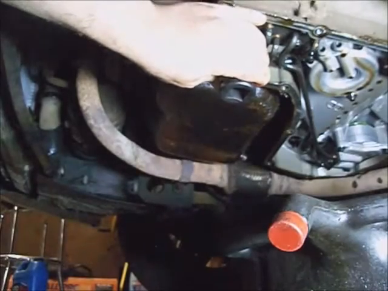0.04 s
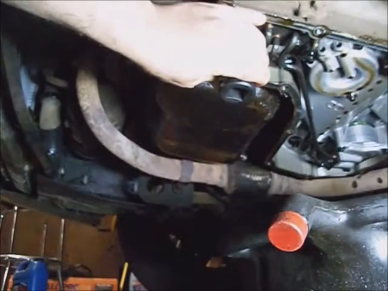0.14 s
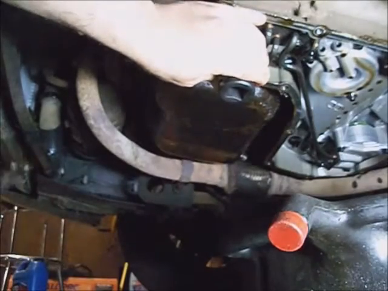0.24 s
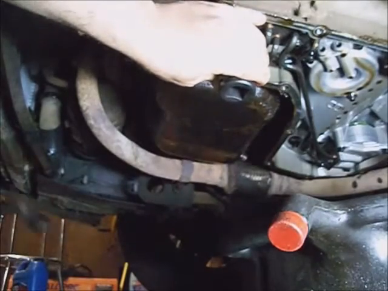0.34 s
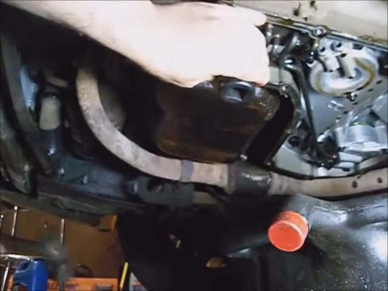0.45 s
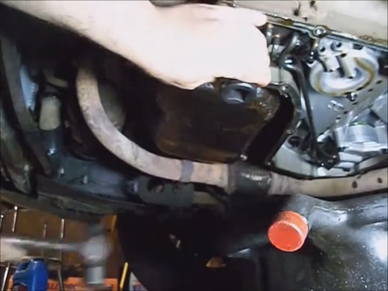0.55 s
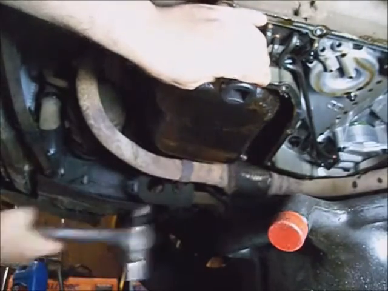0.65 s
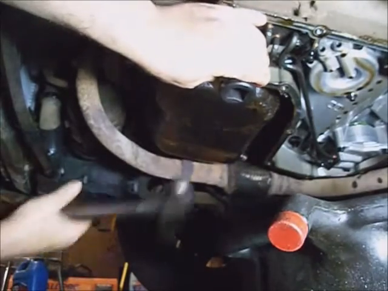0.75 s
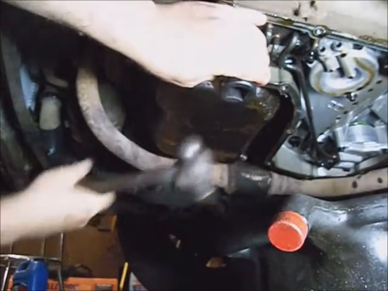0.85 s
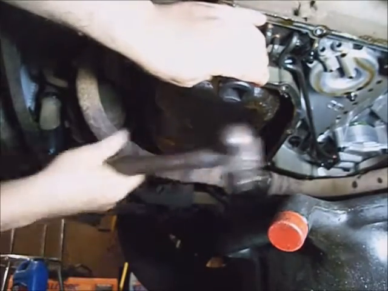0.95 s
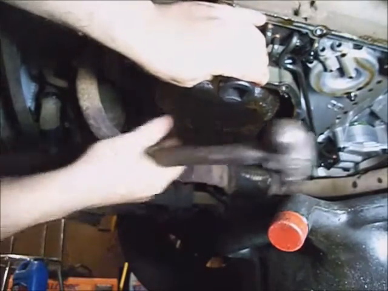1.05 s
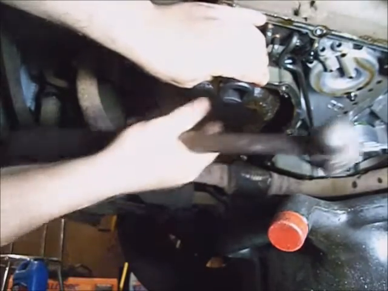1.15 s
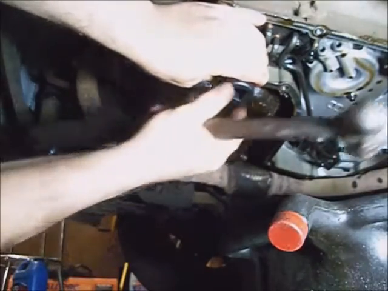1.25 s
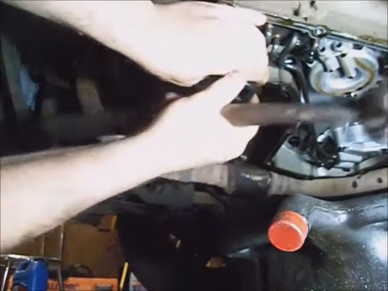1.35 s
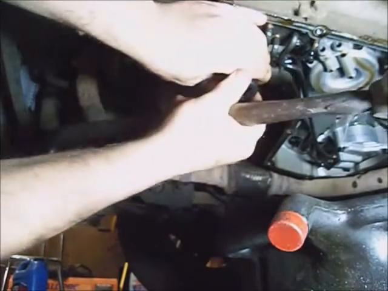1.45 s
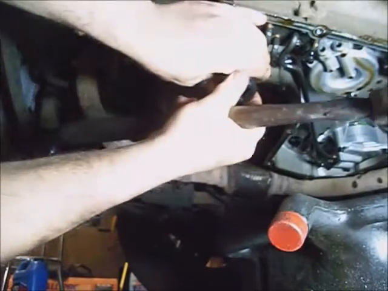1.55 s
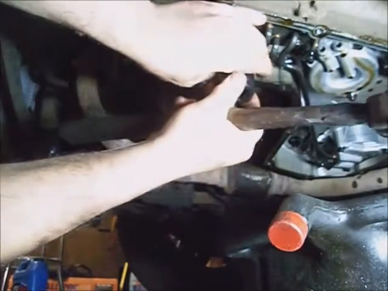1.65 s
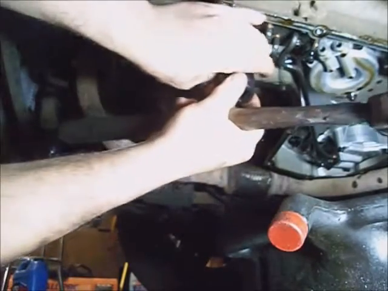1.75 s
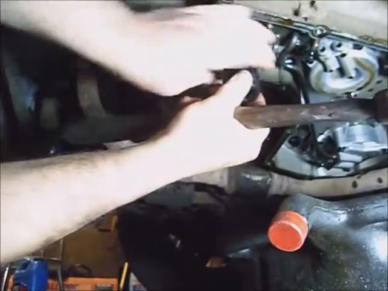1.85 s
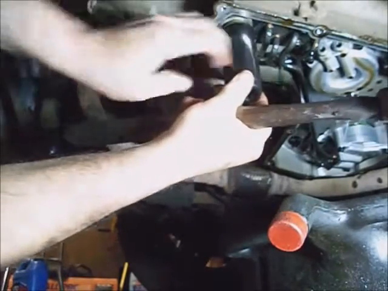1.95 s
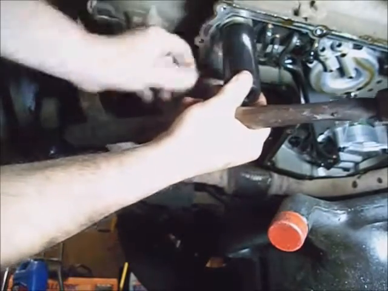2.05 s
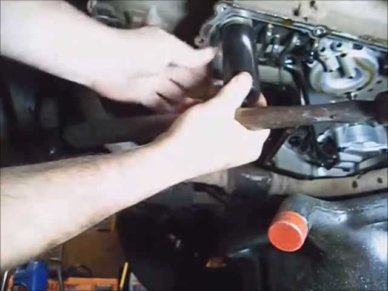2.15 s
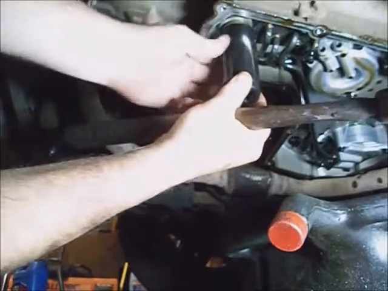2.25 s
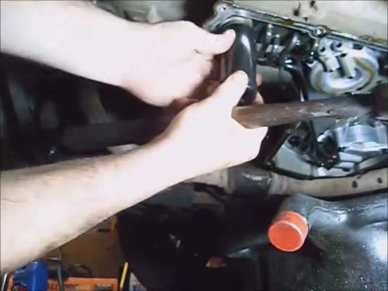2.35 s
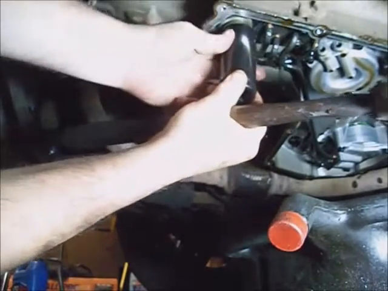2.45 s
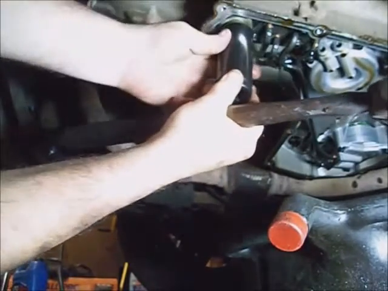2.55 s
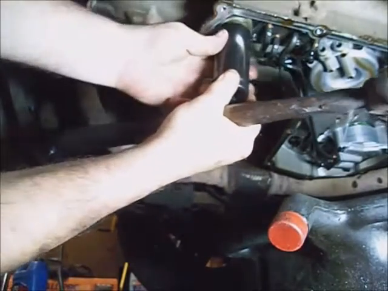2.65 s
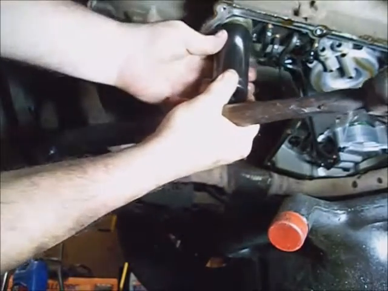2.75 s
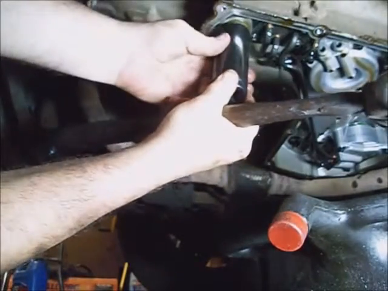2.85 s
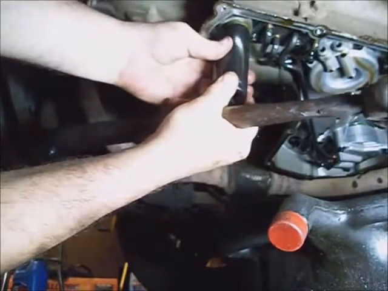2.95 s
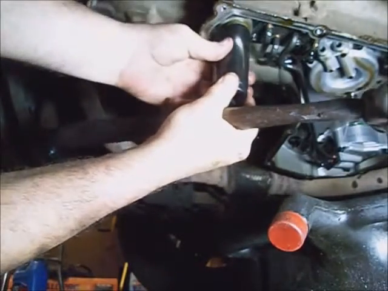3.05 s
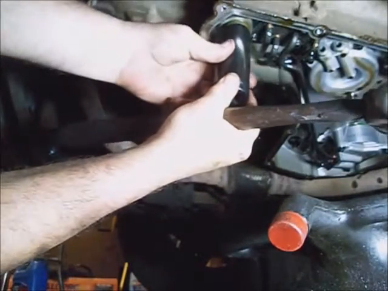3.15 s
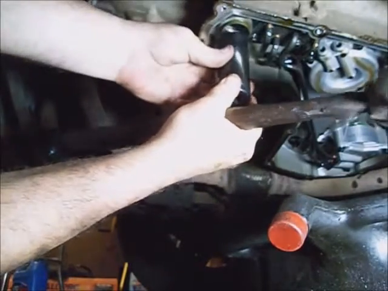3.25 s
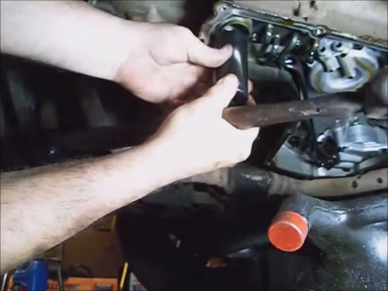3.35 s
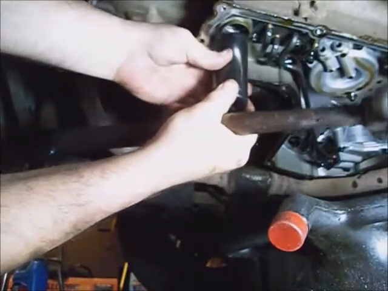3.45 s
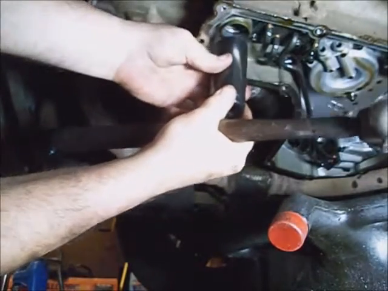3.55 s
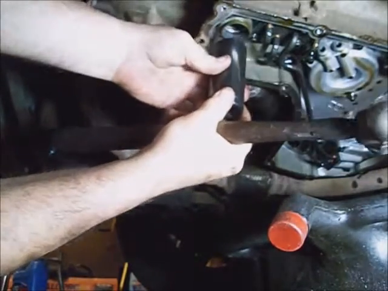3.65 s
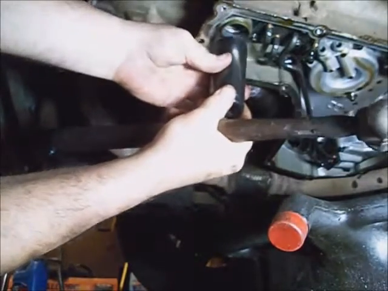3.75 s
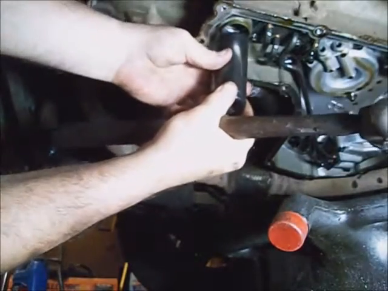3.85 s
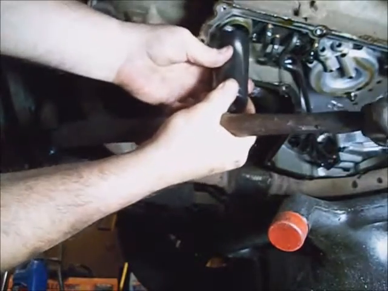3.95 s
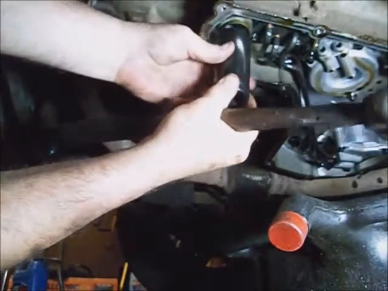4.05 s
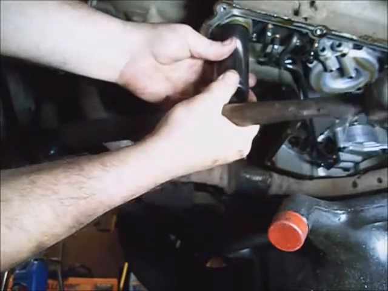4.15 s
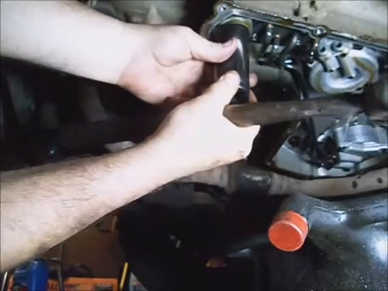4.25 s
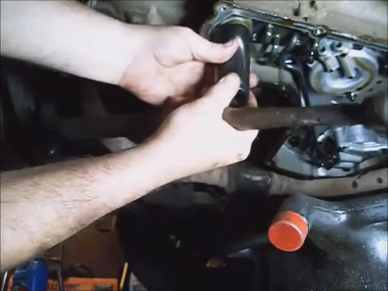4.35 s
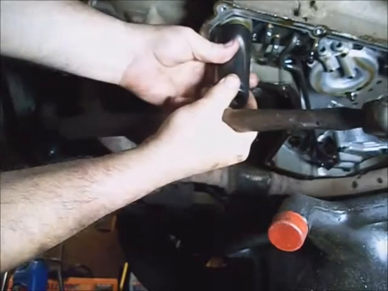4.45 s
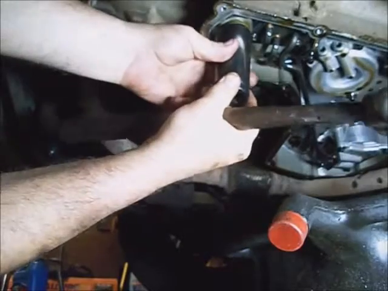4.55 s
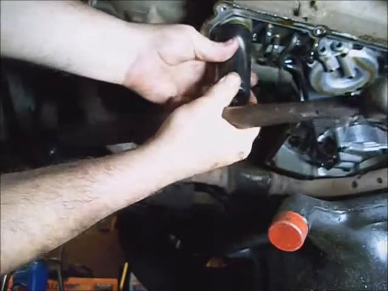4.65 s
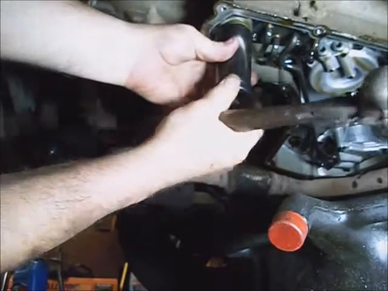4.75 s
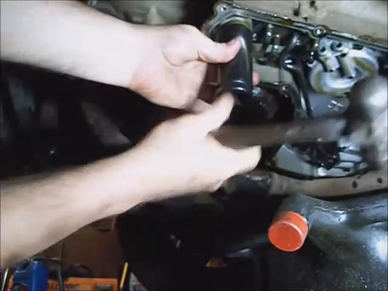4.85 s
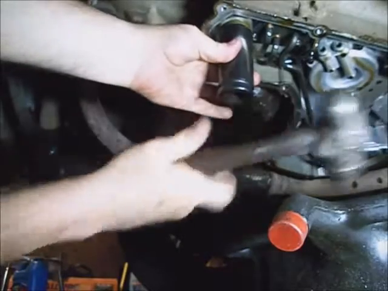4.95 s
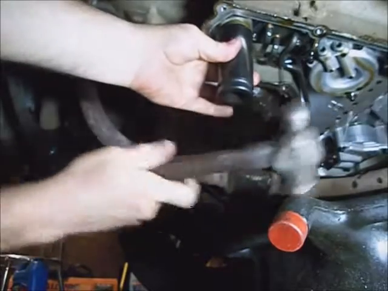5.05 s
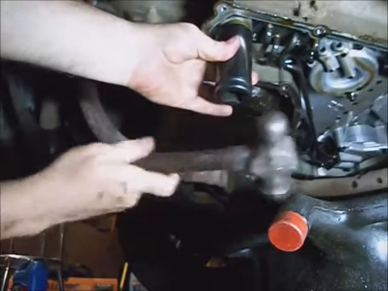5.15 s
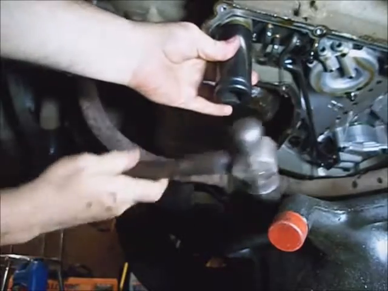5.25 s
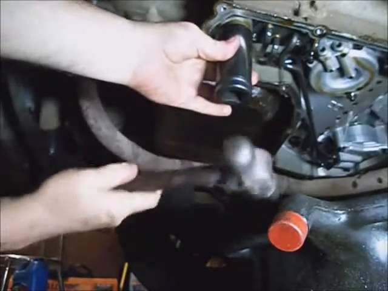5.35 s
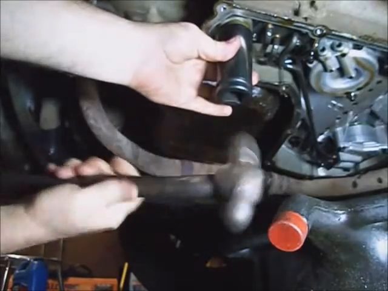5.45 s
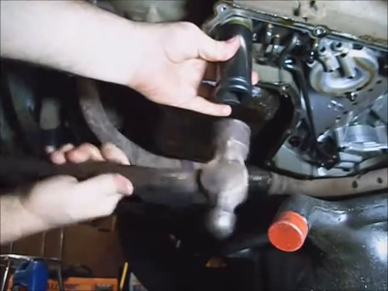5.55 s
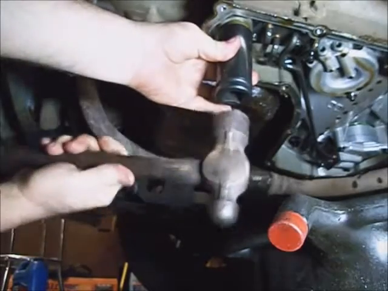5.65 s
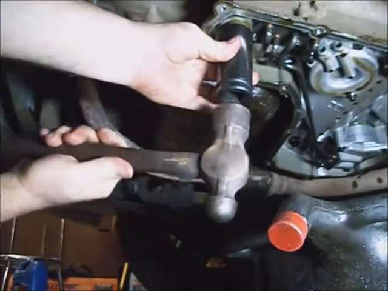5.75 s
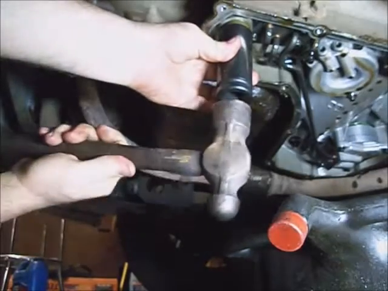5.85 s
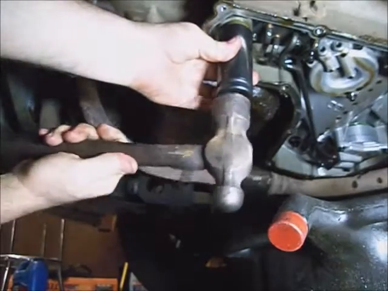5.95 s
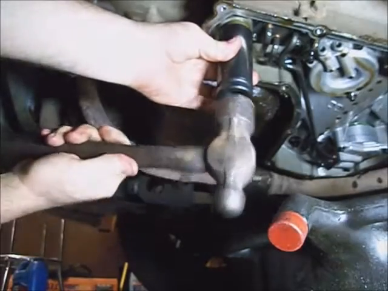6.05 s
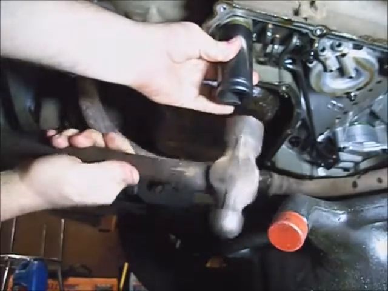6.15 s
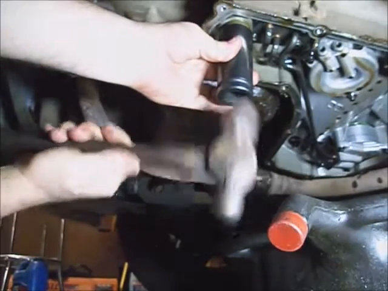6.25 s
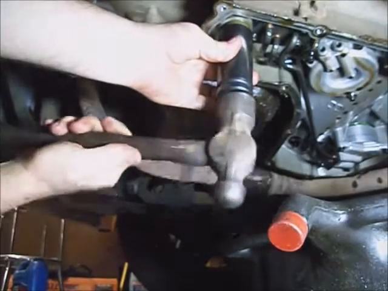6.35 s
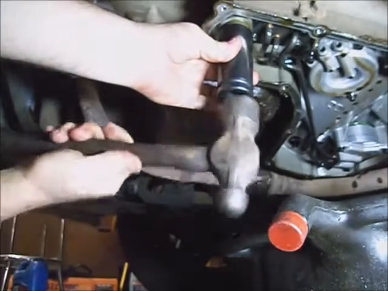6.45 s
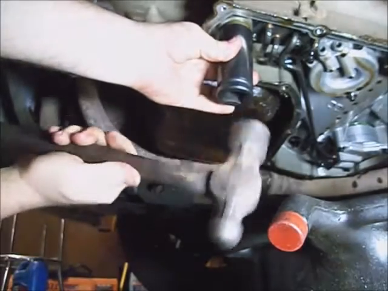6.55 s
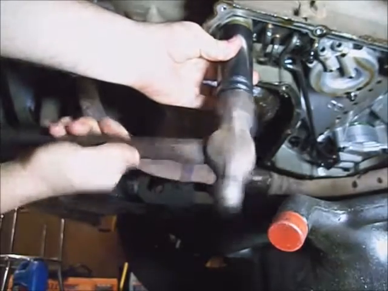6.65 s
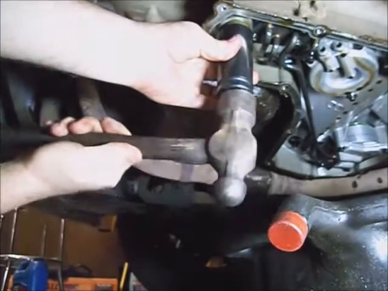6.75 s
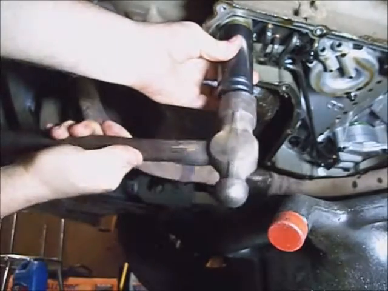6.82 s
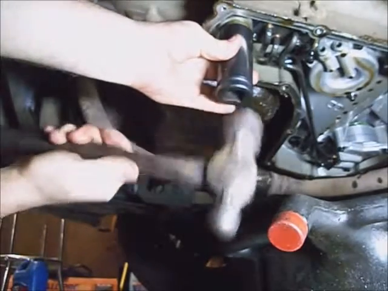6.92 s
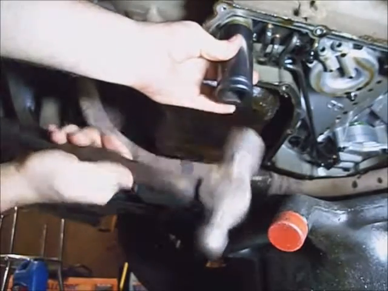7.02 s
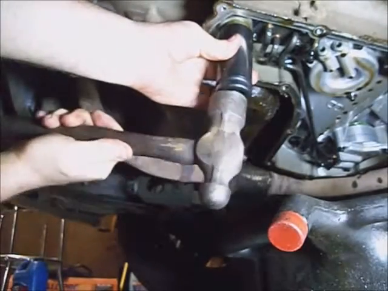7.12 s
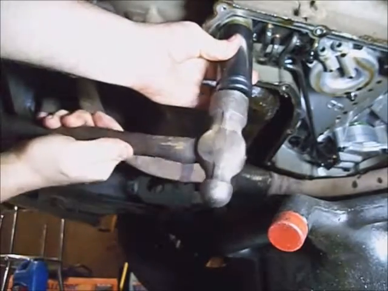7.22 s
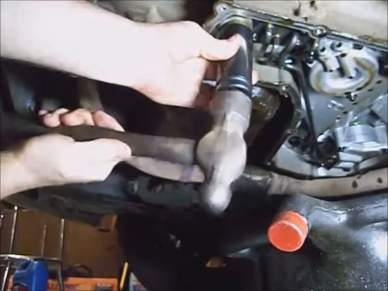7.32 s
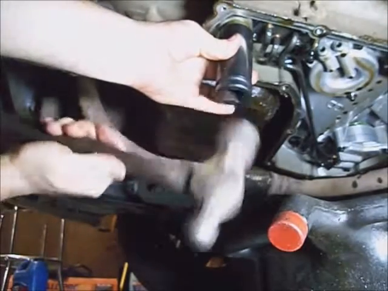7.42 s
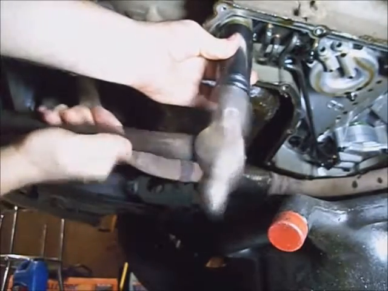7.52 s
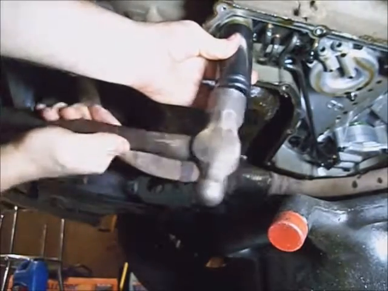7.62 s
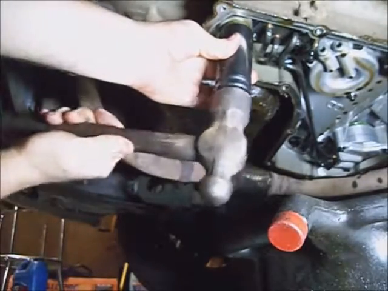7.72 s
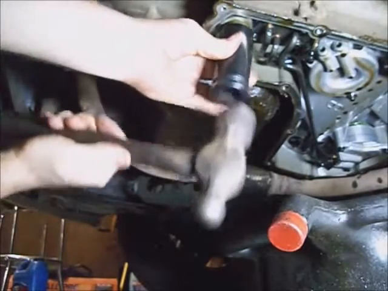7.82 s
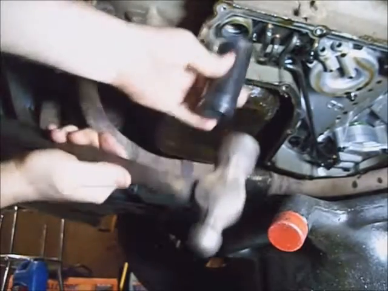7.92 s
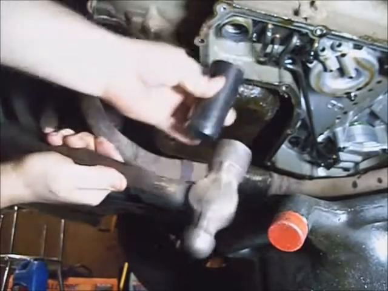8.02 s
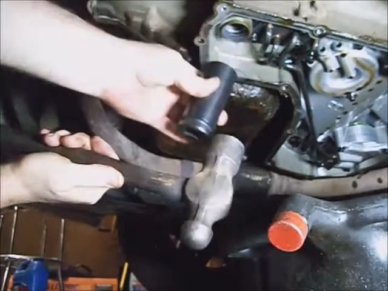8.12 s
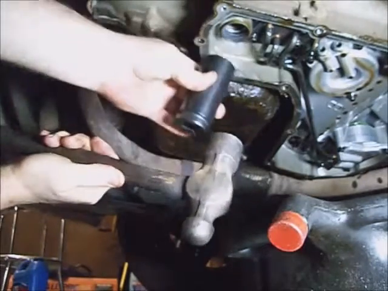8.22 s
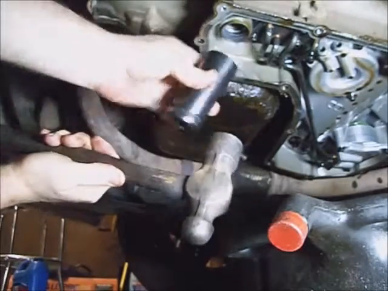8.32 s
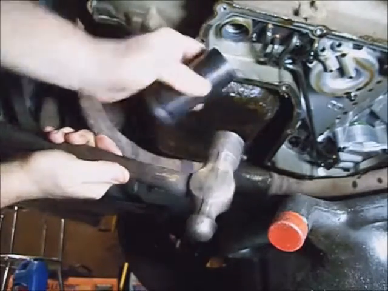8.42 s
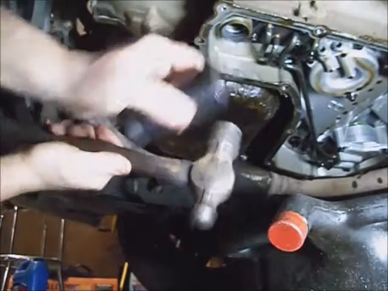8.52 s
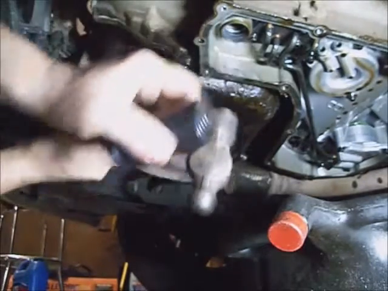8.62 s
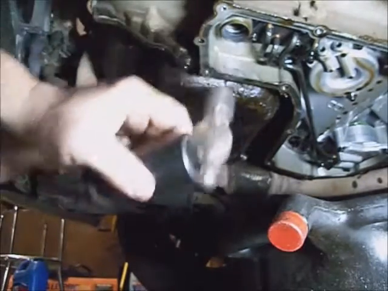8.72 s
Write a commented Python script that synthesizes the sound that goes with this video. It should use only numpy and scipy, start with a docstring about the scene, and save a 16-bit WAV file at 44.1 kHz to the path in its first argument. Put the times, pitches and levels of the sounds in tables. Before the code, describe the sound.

Four sharp hammer blows on a steel socket are the main sound, coming late, with the final pair harder and slightly distorted. Before them come a tool clattering down, faint hand rustle, a few soft knocks on engine metal and a low thump on a car body. The socket then clicks off. A close microphone picks up constant hiss, faint rumble and a short garage echo.

```python
"""Under a car in a garage, a tool clatters down and rings. Hands rustle and nudge the housing, and a big
socket settles on a seal. Something soft bumps the body, which booms. Four hammer blows then drive the
seal home, each exciting the modes of socket and casing; the last two bottom out and ring the housing.
Finally the socket clicks off. Throughout, the room rumbles and echoes, and a close microphone hisses;
it overloads on the hardest blows."""
import sys
import numpy as np
from scipy import signal
from scipy.fft import rfft, irfft
from scipy.io import wavfile

SR = 44100
rng = np.random.default_rng(int(sys.argv[2]) if len(sys.argv) > 2 else 0)


def materialize(psi):
    """Save the field psi as 16-bit PCM at rate SR to the path in sys.argv[1].

    A 1-D psi becomes a single channel; in a 2-D psi each row is a channel.
    """
    bounded = np.clip(np.atleast_2d(psi).T, -1, 1)
    quanta = np.round(bounded * 32767).astype(np.int16)
    wavfile.write(sys.argv[1], SR, quanta)


N = 387198
T = np.arange(int(.7 * SR)) / SR  # time since an impact [s]

# spectra of garage echo, room rumble, hiss and sleeves: (frequency [Hz], relative level [dB])
ECHO_SPECTRUM = [(30, 1), (90, -5.5), (250, -1.5), (500, 2), (1000, -0.5), (2000, -0.5), (3500, -4.5),
                 (6000, -2.5)]
RUMBLE_SPECTRUM = [(25, -7.5), (50, -6.5), (70, -8.5), (90, 1.5), (120, -7), (200, -6), (300, -15.5),
                   (360, -10), (450, -15), (600, -8.5), (750, -15), (1200, -31.5)]
HISS_SPECTRUM = [(400, -30), (750, -24), (1050, -8.5), (1300, -14), (1650, -19), (2000, -17), (2500, -11),
                 (2750, -7), (2880, -10), (3350, -5.5), (3620, -8), (3950, -4.5), (4180, 3), (4800, -0.5),
                 (5900, -11.5)]
RUSTLE_SPECTRUM = [(60, -17.5), (150, -9), (300, -7), (430, -4), (560, 3.5), (720, -3), (1050, -8),
                   (1500, -8.5), (3000, -27.5)]
# narrow resonances in the hiss: (frequency [Hz], width [Hz], lift [dB])
HISS_RESONANCES = [(837, 50, 7.5), (1003, 150, 5.5), (1377, 50, 7), (1735, 14, 9), (2221, 33, 8),
                   (2642, 49, 7), (3723, 52, 11), (3815, 50, 9.5), (4060, 55, 6.5), (4330, 11, 3.5),
                   (4480, 21, 5), (4160, 44, 3), (5199, 45, 9), (5243, 55, 8), (5563, 110, 11.5)]
# course of the hiss: (time [s], level [dB])
HISS_ENVELOPE = [(0, -42), (.7, -44), (4.9, -44.5), (5.5, -43.5), (8.78, -43.5)]

# modes of the struck parts: (frequency [Hz], relative level [dB], nominal t60 [s])
TOOL_MODES = [(222, -25, 0.22), (376.6, -18, .07), (520, -12, 0.034), (677, -8, 0.022), (796, -13, 0.045),
              (975, -11, 0.023), (1190, -12.5, 0.051), (1275, -12, 0.042), (1628, -26.5, 0.035),
              (1924, -20.5, .035), (2355, -18, .035), (4343, -7.5, .015), (5206, -14, 0.017)]
BODY_MODES = [(91.3, -12.5, 0.26), (137, -16, 0.15), (216, 1, 0.042), (277.2, -17, 0.047),
              (379, -21, 0.045), (504, -31.5, 0.11), (606, -21, 0.037)]  # car body
HELD_SOCKET_MODES = [(1030, -49, .05), (2304, -22.5, 0.029), (2620, -21, .026), (2846, -15.5, 0.023),
                     (3110, -29, .008), (3630, -14, 0.015)]  # socket damped by fingers
SOCKET_MODES = [(1503, -21.5, 0.03), (1797, -10.5, 0.023), (2028, -23, 0.074), (2130, -18, .04),
                (2250, -16.5, 0.031), (2501, -10.5, 0.033), (2752, -22.5, 0.075), (3012, -20, 0.071),
                (3036, -13.5, 0.029), (3727, -4.5, 0.019), (3947, -13.5, 0.011), (3880, -27, 0.041),
                (4180, -34.5, 0.08), (4523, -27.5, 0.064), (4560, -25, 0.066), (4564, -25.5, 0.062),
                (5420, -21.5, 0.045)]  # steel socket and hammer head
CASING_MODES = [(236.2, -24.5, .1), (398.4, -20, 0.096), (523, -11.5, 0.028), (630, -19.5, 0.13),
                (720, -13.5, 0.042), (820, -7, 0.042), (1066, -10, 0.039), (1115, -14, .065),
                (1216, -10, 0.054), (1387, -15, 0.034)]  # engine casing, knocked through the sliding seal
SEAT_MODES = [(244, -26, 0.085), (801, -11.5, 0.052), (897.5, 6.5, 0.035), (1020.5, 7.5, 0.033),
              (1095.6, -12, 0.093), (1820, -10, 0.033)]  # housing round the seal's seat

# hands shift their grip: (start [s], duration [s], level [dB])
GRIP_CHANGES = [(0, 0.92, -64), (1.081, 0.67, -60), (2.07, .7, -60.5), (2.92, 0.44, -62)]
# the tool lands and bounces: (time [s], gain [dB], contact cut-off [Hz])
TOOL_BOUNCES = [(0.285, 3, 2130), (0.2879, -4, 7000), (0.3176, -17, 5000), (0.3466, -14, 4500),
                (0.3818, -30.5, 2000)]
# hand and hammer nudge the housing: (time [s], casing gain [dB], seat gain [dB], contact cut-off [Hz])
HOUSING_NUDGES = [(0.5744, -26, -19.5, 1100), (1.439, -34, -48, 700), (1.865, -29.5, -28.5, 846),
                  (2.635, -30.5, -52, 400), (7.149, -47.5, -43.5, 803), (7.607, -22.5, -39.5, 625),
                  (8.56, -30, -59.5, 331)]
# the socket settles on the seal: (time [s], gain [dB])
SOCKET_SETTLES = [(2.973, -20), (4.2332, -12.5)]
# hammer blows: (time [s], force [dB], slip of the seal [0-1], seat gain relative to force [dB])
BLOWS = [(6.3683, 0, 0.26, -15), (6.7518, -0.5, 0.81, -23), (7.1862, 6.5, 0.17, 2), (7.6301, 6.5, .24, 2.5)]


def undb(db):
    """Amplitude ratio of a level in decibels."""
    return 10 ** (np.asarray(db) / 20)


def fade(t60):
    """Exponential decay of a damped vibration, 60 dB down after t60 seconds."""
    return np.exp(-np.log(1000) * T / max(t60, 1e-3))


def add(track, start_s, sound):
    """Superposition: a sound adds linearly to the track."""
    i = int(start_s * SR)
    track[i:i + len(sound)] += sound[:N - i]


def lowpass(x, hz):
    """A contact of finite duration excites little above its cut-off: a two-pole low-pass."""
    return signal.sosfilt(signal.butter(2, min(hz, SR / 3), fs=SR, output="sos"), x)


def radiate(x, hz):
    """Radiation efficiency falls at wavelengths much longer than the part: a high-pass."""
    return signal.sosfilt(signal.butter(2, hz, "high", fs=SR, output="sos"), x)


def wander(per_s):
    """Slow random fluctuation with a spread near 1, joining per_s random values a second."""
    steps = rng.standard_normal(1000)
    return 1.1 * np.interp(np.arange(N) / SR * per_s, np.arange(len(steps)), steps)


def noise(spectrum, size, peaks=()):
    """Spectral shaping: white noise takes on a spectrum and its resonance peaks, at unit rms."""
    hz, db = np.transpose(spectrum)
    f = np.maximum(np.fft.rfftfreq(size, 1 / SR), 1)
    colour_db = np.interp(np.log(f), np.log(hz), db)
    for centre, width, lift in peaks:
        colour_db += lift * .5 ** ((2 * (f - centre) / width) ** 2)
    x = irfft(rfft(rng.standard_normal(size)) * undb(colour_db), size)
    return x / x.std()


def ring(modes, t60_scale=1, polarity=-1):
    """Modal synthesis: damped sines, varied at each blow; at polarity -1 neighbours swing opposite ways."""
    out = np.zeros(len(T))
    for k, (hz, db, t60) in enumerate(modes):
        amplitude = polarity ** k * undb(db + 1.1 * rng.standard_normal())
        detuned_hz = hz * (1 + 0.0057 * rng.standard_normal())
        out += amplitude * fade(t60 * t60_scale) * np.sin(2 * np.pi * detuned_hz * T)
    return out


def dense_modes(db, t60, band_hz):
    """Modal overlap: many weak, close modes merge into a decaying band of noise."""
    band = signal.butter(2, band_hz, "band", fs=SR, output="sos")
    x = signal.sosfilt(band, rng.standard_normal(len(T)))
    return undb(db) * fade(t60) * x / x.std()


def garage(x, near_db, near_t60, far_db, far_t60):
    """Reverberation: direct sound, quick scatter from the car's underside, then the room's diffuse tail."""
    near = noise(ECHO_SPECTRUM, len(T)) * fade(near_t60) * (1 - fade(0.06))
    far = noise(ECHO_SPECTRUM, len(T)) * fade(far_t60) * np.clip((T - .012) / .008, 0, 1)
    response = undb(near_db) * near / np.linalg.norm(near) + undb(far_db) * far / np.linalg.norm(far)
    return x + signal.fftconvolve(x, response)[:N]


def engine_bay(x):
    """Reverberation of sound that starts at the engine's parts."""
    return garage(x, near_db=-17.5, near_t60=0.078, far_db=-22.5, far_t60=0.47)


def background():
    """The noise floor: steady room rumble and the microphone's slightly drifting self-noise."""
    rumble = undb(-65) * noise(RUMBLE_SPECTRUM, N)
    hiss_db = np.interp(np.arange(N) / SR, *np.transpose(HISS_ENVELOPE)) + 0.2 * wander(per_s=3)
    hiss = undb(hiss_db) * noise(HISS_SPECTRUM, N, peaks=HISS_RESONANCES)
    return rumble + hiss


def hands():
    """Friction noise of hands and sleeves: each change of grip rises quickly, eases off and stops."""
    attack_s, release_s, sag_db_per_s = 0.046, 0.17, 5
    t = np.arange(N) / SR
    effort = undb(-73.5)  # hands that only hold on
    for start, duration, db in GRIP_CHANGES:
        gate = np.clip(np.minimum((t - start) / attack_s, (start + duration - t) / release_s), 0, 1)
        effort = effort + gate * undb(db - sag_db_per_s * np.maximum(t - start, 0))
    return effort * undb(2.0 * wander(per_s=12)) * noise(RUSTLE_SPECTRUM, N)


def socket(t60_scale):
    """Free vibration of the steel socket: a clink of high, short-lived modes."""
    return ring(SOCKET_MODES, t60_scale) + dense_modes(db=-13.5, t60=0.059 * t60_scale, band_hz=(1282, 4930))


def casing(db, t60_scale):
    """The casing's modes knock; loose parts respond nonlinearly, rattling more under firm blows."""
    loose_parts = dense_modes(db=-15.5 + 0.11 * db, t60=.27, band_hz=(620, 1222))
    return undb(db) * (ring(CASING_MODES, t60_scale) + loose_parts)


def seat(t60_scale):
    """Compliance: rubber cushions the seal's landing, so the housing's modes swell over a few cycles."""
    swell = 1 - fade(t60=0.031)
    return ring(SEAT_MODES, t60_scale, polarity=0.96) * swell


def lining_up():
    """Soft contacts favour the low modes: the housing is nudged and the socket settles on the seal."""
    out = np.zeros(N)
    for start, casing_db, seat_db, contact_hz in HOUSING_NUDGES:
        nudge = casing(casing_db, t60_scale=0.97) + undb(seat_db) * seat(t60_scale=0.97)
        add(out, start, lowpass(nudge, contact_hz))
    for start, db in SOCKET_SETTLES:
        settle = undb(db) * socket(t60_scale=1.8) + casing(db - 9, t60_scale=1.8)
        add(out, start, lowpass(settle, hz=626))
    return engine_bay(radiate(out, hz=125))


def socket_off():
    """Damping by the fingers leaves only a click as the socket is pulled off the metal."""
    out = np.zeros(N)
    click = ring(HELD_SOCKET_MODES, polarity=0.95) + dense_modes(db=-25.5, t60=0.045, band_hz=(1800, 4000))
    add(out, 8.1627, click)
    out = radiate(lowpass(out, hz=4920), hz=760)
    return garage(out, near_db=-7, near_t60=0.046, far_db=-18.0, far_t60=0.25)


def body_bump():
    """A soft, heavy impact drives the car body's low modes; the jolted socket clicks."""
    out = np.zeros(N)
    click = undb(-21.0) * socket(t60_scale=.78) + casing(db=-26.0, t60_scale=.78)
    add(out, 5.1642, lowpass(click, hz=4400))
    boom = lowpass(ring(BODY_MODES, polarity=0.98), hz=700) * (1 - fade(0.0058))
    add(out, 5.1672, boom + dense_modes(db=-37.5, t60=0.22, band_hz=(300, 1087)))
    return garage(radiate(out, hz=48), near_db=-20.5, near_t60=0.12, far_db=-16.5, far_t60=0.37)


def tool_down():
    """Inelastic collisions: a tool lands hard, bounces lightly and rattles; its support shudders."""
    out = np.zeros(N)
    for start, db, contact_hz in TOOL_BOUNCES:
        hit = ring(TOOL_MODES) + dense_modes(db=-12.0, t60=.04, band_hz=(309.6, 4514))
        add(out, start, undb(db) * lowpass(hit, contact_hz))
    out = radiate(out, hz=138)
    rattle = dense_modes(db=-24.5, t60=0.3, band_hz=(1700, 3184))
    shudder = dense_modes(db=-24.5, t60=0.47, band_hz=(40, 417))
    landing_s = TOOL_BOUNCES[0][0]
    add(out, landing_s, (rattle + shudder) * (1 - fade(.2)))
    return garage(out, near_db=-11.5, near_t60=0.17, far_db=-17.5, far_t60=.33)


def hammering():
    """Impulse transmission: steel clinks, the seal knocks the casing, meets its seat; the engine shakes."""
    seat_delay_s = .0039
    parts, engine = np.zeros(N), np.zeros(N)
    for start, force_db, slip, seat_db in BLOWS:
        t60_scale = .64 + 0.92 * slip  # a slipping seal lets the parts ring on
        contact_hz = 4200 * 2 ** (0.18 * force_db)  # harder blows make shorter, brighter contact
        knock = casing(force_db + 20 * np.log10(max(slip, .01)), t60_scale)
        clink = undb(force_db) * socket(t60_scale)
        add(parts, start, lowpass(clink + knock, contact_hz))
        add(parts, start + seat_delay_s, undb(force_db + seat_db) * seat(t60_scale))
        add(engine, start, undb(.5 * force_db) * dense_modes(db=-42, t60=0.39, band_hz=(25, 300)))
    return engine_bay(radiate(parts, hz=122) + engine)


def scene():
    """The pressures of all sources superpose at one microphone."""
    impacts = hammering() + lining_up() + socket_off() + tool_down() + body_bump()
    return (impacts + hands() + background())[None]


def record(dry):
    """Saturation in a narrow-band microphone path; filter overshoots clip again, adding higher treble."""
    overload, band_hz, top_hz = 0.96, 5750, 15500
    saturated = np.clip(dry, -overload, overload)
    narrow = signal.sosfilt(signal.ellip(8, .3, 75, band_hz, fs=SR, output="sos"), saturated)
    clipped = np.clip(narrow, -1, 1)
    return signal.sosfilt(signal.ellip(8, .2, 70, top_hz, fs=SR, output="sos"), clipped)


dry = scene()
out = record(dry)
materialize(out)
```